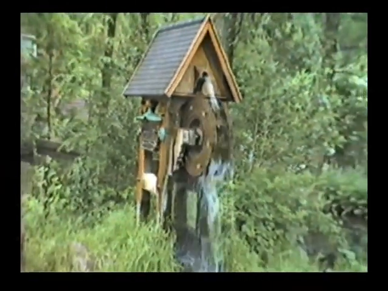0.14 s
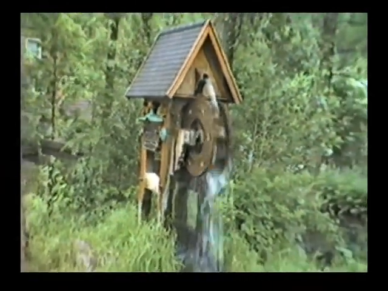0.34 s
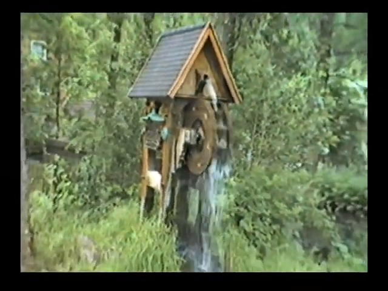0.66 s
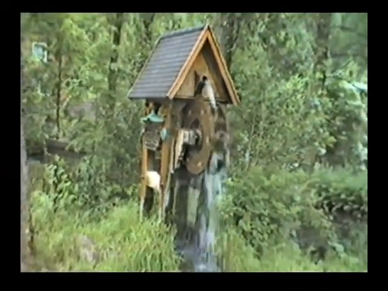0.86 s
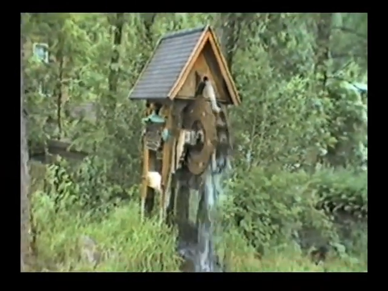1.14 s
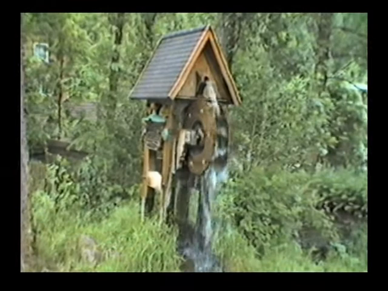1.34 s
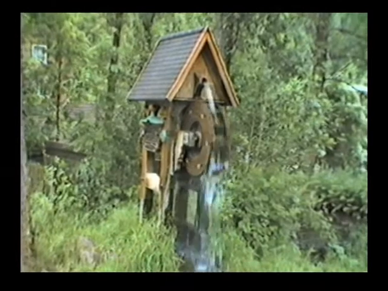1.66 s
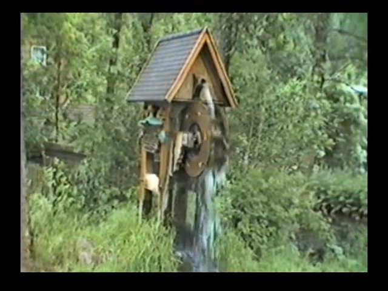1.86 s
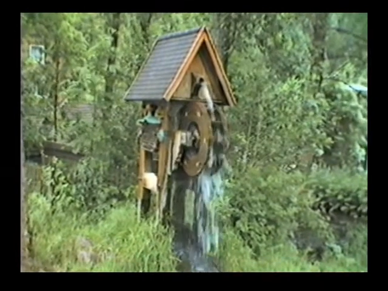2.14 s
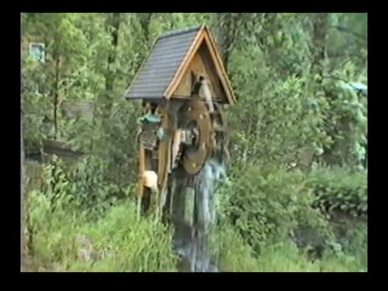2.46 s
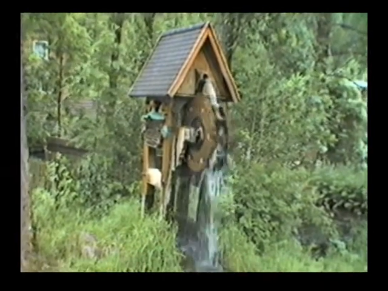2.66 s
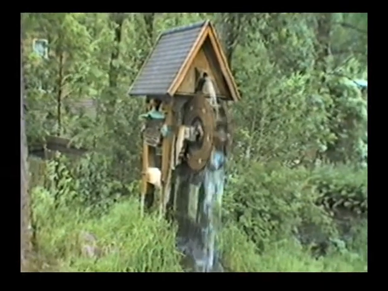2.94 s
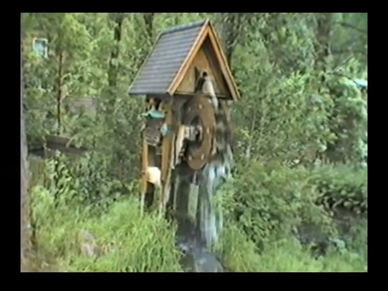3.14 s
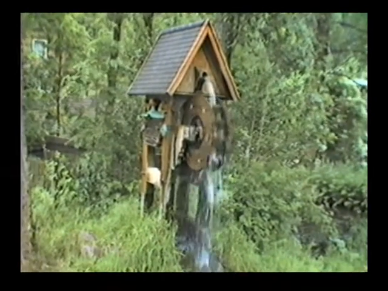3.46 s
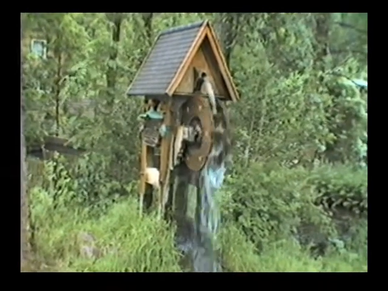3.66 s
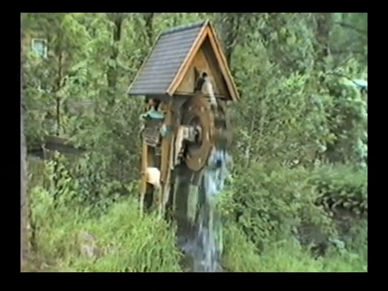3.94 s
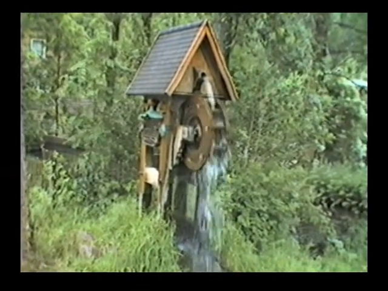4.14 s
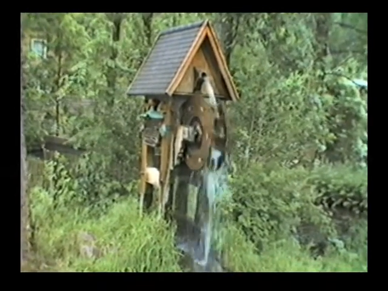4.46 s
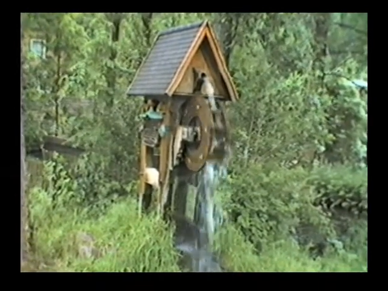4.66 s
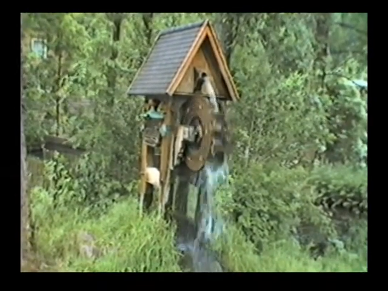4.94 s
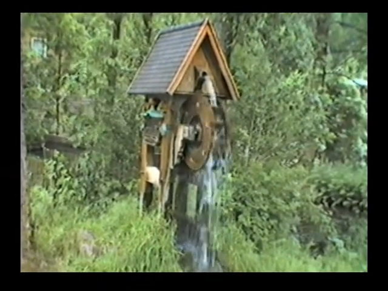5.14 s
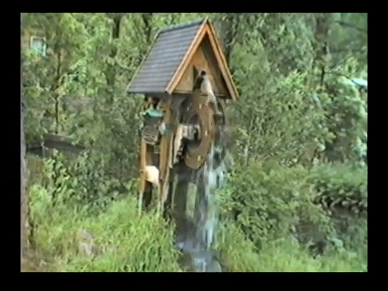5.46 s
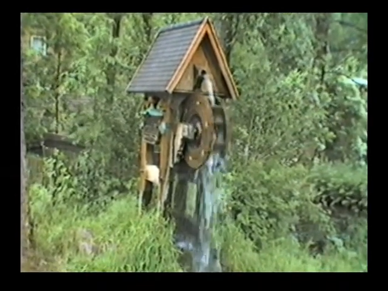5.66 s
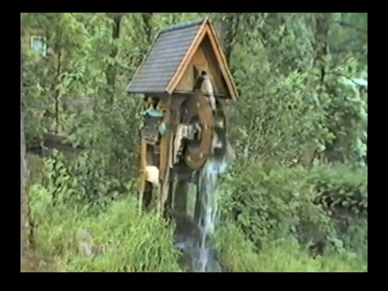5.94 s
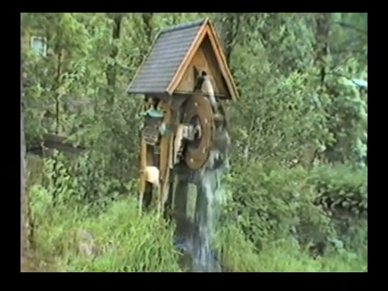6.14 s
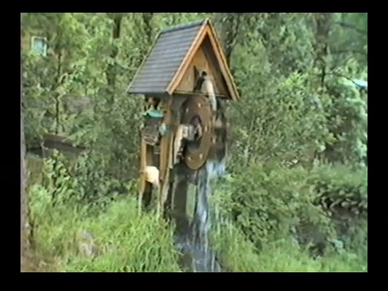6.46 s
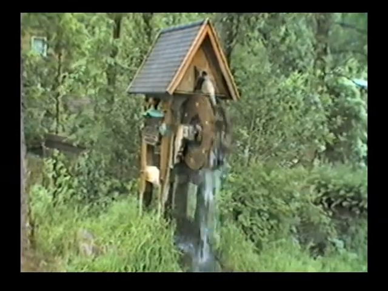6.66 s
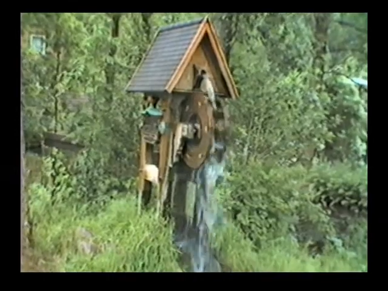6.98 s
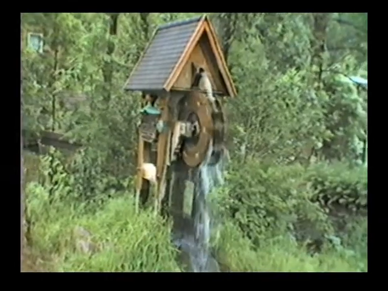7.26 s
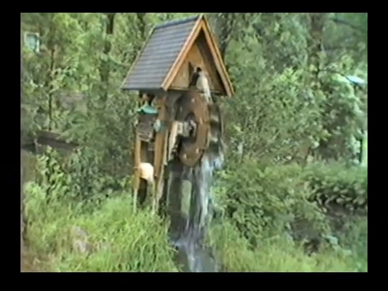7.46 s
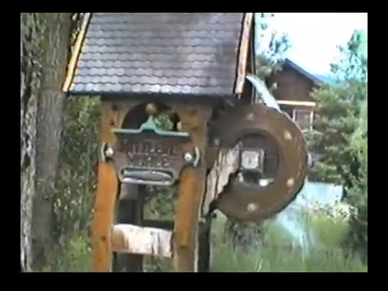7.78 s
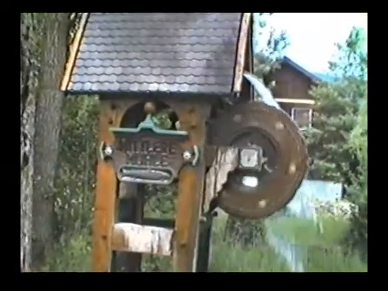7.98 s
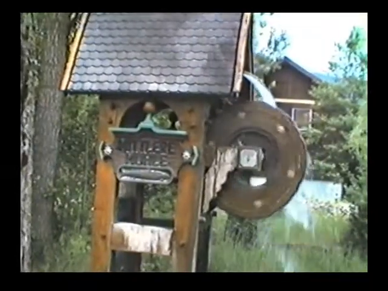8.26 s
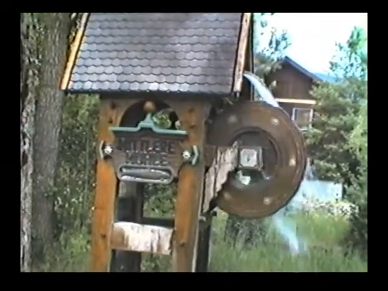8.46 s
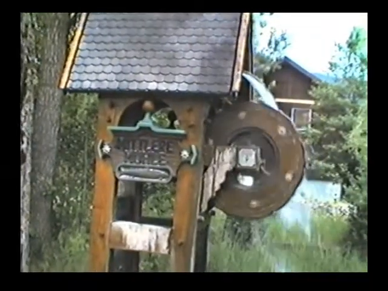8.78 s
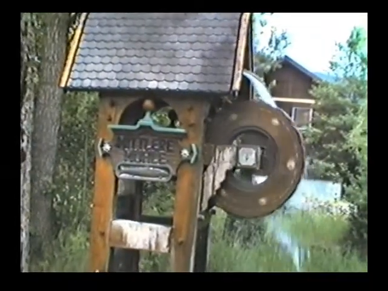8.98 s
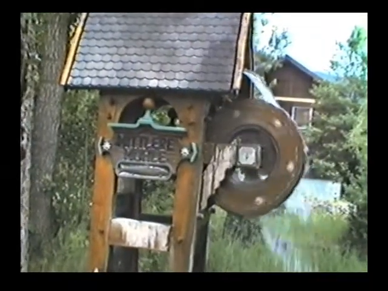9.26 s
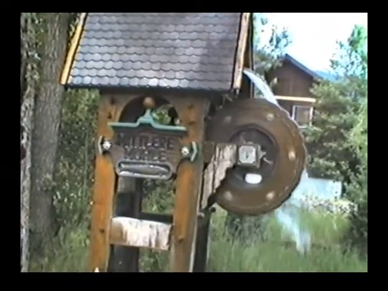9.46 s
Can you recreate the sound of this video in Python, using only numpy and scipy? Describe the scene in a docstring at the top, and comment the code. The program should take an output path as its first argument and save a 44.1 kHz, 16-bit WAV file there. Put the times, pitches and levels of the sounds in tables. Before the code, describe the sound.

A small wooden water wheel runs in a garden, heard from the front on a nearly mono camera microphone with faint hiss and thin whine. From 0 to 7.7 s, short noisy splashes fall about eight per second over steady run-off, repeating unevenly each 1.5 s turn; heavier gushes slap and resonate on hollow wood, while small bubbles plip, one clear at 0.4 s. A faint throbbing drone around 130 Hz lies behind, with one distant engine slowing until 2.4 s and another slowly climbing from 0.9 s. Light wooden clacks come near 1 s. The water grows slightly stronger towards 7.4 s. Between 7.1 and 7.9 s irregular clacks cluster, the loudest at 7.54 s, with soft low thuds. At 7.73 s the sound abruptly moves close beside the wheel: treble dulls, then partly reopens. Splashing and hollow gushes strengthen until 9.6 s, with round low glugs at 8.35, 8.65 and 9.4 s.

```python
"""In a garden a small wooden water wheel turns once in about 1.5 s. Its twelve buckets throw short splashes of
noise-like droplets over steady run-off; heavier gushes excite the damped modes of hollow wood at set places in the turn.
Bubbles ring as rising tones, and blows on the wood make clacks; a few soft low thuds join them. Behind lie a machine
hum of narrow-band noise and distant engines of harmonic orders. A small tape camera, nearly mono, listens from the
front, then from close beside, where the treble dulls suddenly and partly opens again."""
import sys
import numpy as np
from scipy import signal
from scipy.fft import rfft, irfft
from scipy.io import wavfile
from scipy.ndimage import uniform_filter1d

SR = 44100
rng = np.random.default_rng(int(sys.argv[2]) if len(sys.argv) > 2 else 0)


def wrap_up_sound(samples):
    """Save the sound to the file named by the first command line argument, as 16-bit audio."""
    columns = np.atleast_2d(samples).T
    # keep every value between -1 and 1, then stretch to whole-number steps
    tamed = np.clip(columns, -1, 1)
    steps = np.round(tamed * 32767).astype(np.int16)
    wavfile.write(sys.argv[1], SR, steps)


N = 424241
T = np.arange(N) / SR  # s
HZ = np.fft.rfftfreq(N, 1 / SR)

# gain over time of the falling water, thrown spray and gushes alike: t/s, relative level/dB
FLOW_LEVEL = [(0, -3.15), (7.4, 0.5), (8.1, -1.5), (8.4, .5), (9.62, 4)]


def amp(db):
    """Level law: decibels to amplitude ratio."""
    return 10 ** (np.asarray(db) / 20)


def evened(x):
    """Power normalisation: scales a signal to rms 1."""
    return x / np.sqrt(np.mean(x ** 2) + 1e-20)


def over_time(track):
    """Linear interpolation: a (t/s, value) track read at every sample."""
    return np.interp(T, *np.transpose(track))


def shape(points):
    """Spectral envelope: gain at every frequency, interpolated in dB over log frequency."""
    hz, db = np.transpose(points)
    return amp(np.interp(np.log(HZ + 1), np.log(hz), db))


def notch(hz, width_hz, depth_db):
    """Band rejection: a Gaussian dip, in decibels, in a frequency response."""
    return amp(-depth_db * np.exp(-((HZ - hz) / width_hz) ** 2))


def filtered(x, response):
    """Convolution theorem: filtering is multiplication of spectra."""
    return irfft(rfft(x) * response, N)


def colour(x, gain, band):
    """Linear filtering of white noise, scaled to expected rms 1 inside the band."""
    inside = (HZ > band[0]) & (HZ < band[1])
    return filtered(evened(x), gain) / np.sqrt(np.mean((gain * inside) ** 2))


def add(mix, s, sound):
    """Superposition: adds a sound to the mix at time s."""
    part = mix[round(s * SR):][:len(sound)]
    part += sound[:len(part)]


def wander(rate_hz):
    """Slow random modulation: low-passed Gaussian noise of rms 1."""
    return evened(filtered(rng.standard_normal(N), np.exp(-(HZ / rate_hz) ** 2)))


def damped_tone(hz, t60, rise):
    """Damped oscillation: a sine with a brief onset that decays by 60 dB in t60 while its pitch may climb."""
    t = np.arange(0, t60, 1 / SR)
    decay = amp(-60 * t / t60)
    onset = 1 - np.exp(-t * hz)
    return decay * np.sin(2 * np.pi * hz * t * (1 + rise * t / t60)) * onset


def patter(per_s, spread_db, mist):
    """Shot noise: random droplet impacts of uneven size, over a mist too fine to resolve."""
    strength = amp(spread_db * np.minimum(rng.exponential(1, N), 4))
    impacts = strength * rng.choice([-1, 1], N) * (rng.random(N) < per_s / SR)
    return evened(impacts) + mist * rng.standard_normal(N)


def clumps(per_s, decay_s, smooth):
    """Filtered Poisson process: sudden clumps of drops whose power relaxes in milliseconds."""
    arrivals = rng.exponential(1, N) * (rng.random(N) < per_s / SR)
    power = signal.lfilter([1], [1, -np.exp(-1 / (decay_s * SR))], arrivals)
    return evened(np.sqrt(power / power.mean() + smooth))


def swell(s, db, rise, fall):
    """Energy envelope: start time and two-sided Gaussian power of one lump of water."""
    t = np.arange(max(s - 2.5 * rise, 0), s + 2.5 * fall, 1 / SR) - s
    return s + t[0], amp(db) ** 2 * np.exp(-(t / np.where(t < 0, rise, fall)) ** 2)


def each_turn(table):
    """Periodicity of rotation: yields (t/s, 0 in front or 1 beside, rest of the row) for every turn."""
    turn_s = 1.5385
    move_s = 7.735  # the listening place changes
    # a moment when a turn begins, then the span heard from that place, all in s
    places = [(0.0, 0, move_s), (8.089, move_s, T[-1])]
    for beside, (begins, since, until) in enumerate(places):
        for turn in range(-1, int(T[-1] / turn_s)):
            for into, *rest in table:
                s = begins + turn * turn_s + into
                if since <= s < until:
                    yield s, beside, *rest


def engine(track, orders):
    """Harmonic synthesis: a few fluctuating low orders of a wandering pitch."""
    s, hz, db = np.transpose(track)
    pitch = np.interp(T, s, hz) * (1 + 0.0052 * wander(5.95))
    cycles = np.cumsum(pitch) / SR
    present = uniform_filter1d(1. * ((T >= s[0]) & (T <= s[-1])), size=6000)
    out = np.zeros(N)
    for k, order_db in orders:
        fading = amp(order_db + 2.8 * wander(2.1))
        low_cut = np.sqrt(2 / (1 + (66 / (k * pitch)) ** 12))  # the deepest orders are weak
        out += fading * low_cut * np.sin(2 * np.pi * (k * cycles + rng.random()))
    return amp(np.interp(T, s, db)) * present * out


def hum():
    """Narrow-band noise: a rough machine drone that throbs quickly, with two distant engines."""
    # drone spectrum: f/Hz, spectral level/dB
    hum_spectrum = [(20, -48), (50, -30), (68, -21.5), (90, -12.5), (105, -7.5), (117, -4.5), (133, 2),
                    (149, 0.5), (170, -15.5), (235, -19.5), (275, -27), (400, -37.5), (800, -81)]
    # drone strength: t/s, level/dB
    hum_level = [(0, -20), (1, -18.5), (3, -19.5), (5, -18), (7.5, -18.5), (8.1, -16), (9.62, -17.5)]
    # pitch glides of the distant engines: t/s, fundamental f/Hz, relative level/dB
    slowing = [(0, 44.8, -25), (.7, 44.9, -36), (1, 44.87, -22.5), (1.6, 40.95, -25), (2.4, 39.9, -35)]
    climbing = [(.9, 22.61, -28), (2.2, 27.55, -27), (3.1, 32.44, -24), (4, 36.6, -21.5), (4.7, 39.4, -25),
                (6, 40.95, -27.5), (7.7, 42.87, -26.5)]
    # their harmonic orders: multiple of the fundamental, mean relative level/dB
    slowing_orders = [(1, -0.5), (2, 2.5), (8, -24)]
    climbing_orders = [(2, -5), (3, 1), (6, -12), (9, -21)]
    drone = colour(rng.standard_normal(N), shape(hum_spectrum), band=(105, 170))
    drone /= np.sqrt(uniform_filter1d(drone ** 2, size=9000))  # holds its strength over about 0.2 s
    traffic = engine(slowing, slowing_orders) + engine(climbing, climbing_orders)
    return amp(over_time(hum_level)) * drone + amp(-4.0) * traffic


def thuds():
    """Damped oscillation at constant pitch: dull low bumps without any ring of wood."""
    # soft bumps: t/s, level/dB, f/Hz, t60/s
    bumps = [(7.541, -19, 330, 0.09), (7.669, -24.5, 277, 0.16), (7.72, -31, 42, .25),
             (7.751, -26, 258, 0.08), (7.85, -17.5, 310, 0.092), (8.16, -28, 40.4, .15)]
    out = np.zeros(N)
    for s, db, hz, t60 in bumps:
        add(out, s, amp(db) * damped_tone(hz, t60, rise=0))
    return out


def faint_bubbles(count, lowest_hz, pitch_ratio, loudest_db, range_db, rise):
    """Random superposition: many weak bubbles scattered over time and log frequency."""
    out = np.zeros(N)
    for when, pitch, size in rng.random((count, 3)):
        hz = lowest_hz * pitch_ratio ** pitch
        plop = damped_tone(hz, 36 / hz, rise)
        add(out, when * T[-1], amp(loudest_db - range_db * np.sqrt(size)) * plop)
    return out


def bubbles():
    """Bubble resonance: trapped air rings and climbs in pitch as it nears the surface of the pool."""
    # the loudest bubbles, low glugs to high plips: t/s, level/dB, starting f/Hz
    loud_bubbles = [(0.403, -16.5, 2970), (3.457, -20, 2800), (4.108, -22, 1096), (4.521, -18, 2820),
                    (4.751, -19, 3010), (5.982, -18, 1045), (6.1298, -19, 3880), (6.156, -20, 1114),
                    (7.027, -19, 1100), (8.3497, -15, 3200), (8.352, -12, 653), (8.653, -14, 618),
                    (9.2628, -20, 3200), (9.378, -17, 700), (9.46, -17.5, 1310)]
    out = np.zeros(N)
    for s, db, hz in loud_bubbles:
        # t60 is a fixed number of cycles, so small, high bubbles die sooner
        add(out, s, amp(db) * damped_tone(hz, 42 / hz, rise=0.023))
    out += faint_bubbles(330, 550, 3.2, loudest_db=-25.0, range_db=12.0, rise=0.033)
    out += faint_bubbles(500, 2300, 3, loudest_db=-19.0, range_db=12.3, rise=0.028)
    return out


def runoff():
    """Stationary shot noise: the steady run-off, broken into slow clumps."""
    # run-off spectrum: f/Hz, spectral level/dB
    runoff_spectrum = [(100, -12), (300, 10), (450, 10), (720, 10), (1000, 5.5), (1400, 6.5), (1900, -1.5),
                       (2800, 0.5), (5800, 0), (7000, -4), (8300, -9.5), (10000, -24.5), (13000, -46)]
    droplets = patter(per_s=2500, spread_db=2.5, mist=1.0)
    flow = colour(droplets, shape(runoff_spectrum), band=(3000, 7000))
    return amp(-40.5) * flow * clumps(per_s=120, decay_s=0.007, smooth=1.0)


def spray():
    """Modulated shot noise: each bucket throws a shower whose power swells and drains."""
    # the twelve buckets: t/s into the turn, relative level/dB, nominal length/s
    buckets = [(.03, -33.5, .055), (.172, -33.5, 0.047), (.285, -30, 0.024), (.43, -33, 0.035),
               (.548, -33.5, 0.063), (.688, -34.5, 0.065), (.815, -35.5, 0.064), (.945, -33, 0.031),
               (1.052, -33, .045), (1.195, -34, 0.036), (1.305, -34, 0.044), (1.445, -32.5, 0.025)]
    # spray spectrum: f/Hz, spectral level/dB
    spray_spectrum = [(150, -21), (450, -4.5), (750, 3.5), (1000, -3), (1400, 5), (2000, 0.5), (2600, 2.5),
                      (3400, 4), (4500, 1), (5800, 3.5), (7000, -2), (8300, -6.5), (10000, -25),
                      (13000, -56)]
    slop_s, fill_db, stretch_spread = .004, 0.73, 0.36  # chance in moment, strength and log duration
    rise_share, fall_share = 0.48, 0.54  # of a splash's length
    flow = np.zeros(N)
    for s, beside, db, length in each_turn(buckets):
        late, fill, slow = rng.standard_normal(3)
        stretch = np.exp(stretch_spread * slow)
        length = length * stretch
        start, power = swell(s + slop_s * late, db + fill_db * fill, length * rise_share, length * fall_share)
        add(flow, start, power / stretch)  # the same water, poured more slowly, is quieter
    droplets = patter(per_s=4500, spread_db=3.0, mist=1.0)
    thrown = colour(droplets, shape(spray_spectrum), band=(3000, 7000))
    thrown = thrown * np.sqrt(flow) * amp(over_time(FLOW_LEVEL))
    return amp(-1.67) * thrown * clumps(per_s=260, decay_s=0.0023, smooth=0.66)


def clacks():
    """Modal synthesis: a blow rings the wooden modes near its own pitch, with a dull tick on top."""
    # blows: t/s, ring peak level/dB, centre f/Hz, spread/octave, factor on the ring time
    blows = [(.966, -22, 1560, 0.46, 0.71), (1.0688, -10.5, 1250, 1.2, 0.74), (7.142, -11.5, 1334, 0.66, 1),
             (7.427, -17, 1000, 0.88, 1.2), (7.537, -11, 1200, 0.72, 1.2), (7.5413, 3, 1180, 0.9, 1.27),
             (7.6701, -10.5, 1000, 0.94, 1.8), (7.7004, -3.5, 1870, 1.14, 0.41),
             (7.727, -15.5, 1300, 1.1, 1.0), (7.834, -13, 625, 0.73, 0.69), (7.883, -15.5, 1350, 1.2, 1.2),
             (8.203, -20, 1200, 0.7, 0.92)]
    # modes of the wheel: f/Hz, relative level/dB, t60/s before the blow's factor
    wood_modes = [(531, 6, 0.031), (720, -2.5, 0.031), (1000, 2, 0.021), (1270, -1, 0.022),
                  (1445, -0.5, 0.042), (1690, -3, 0.015), (2430, -15, 0.024), (3870, -9, 0.022)]
    out, t = np.zeros(N), np.arange(4000) / SR
    hz, db, t60 = np.transpose(wood_modes)[:, :, None]
    sign = (-1) ** np.arange(len(wood_modes))[:, None]  # neighbouring modes start in opposite directions
    soft = signal.butter(4, 5200, fs=SR, output="sos")
    for s, peak_db, centre_hz, spread, ringing in blows:
        reach = np.exp(-(np.log2(hz / centre_hz) / spread) ** 2)
        decay = amp(db - 60 * t / (t60 * ringing))
        ring = (sign * reach * decay * np.sin(2 * np.pi * hz * t)).sum(0)
        tick = signal.sosfilt(soft, rng.standard_normal(len(t))) * np.exp(-t / .0016)
        add(out, s, amp(peak_db) * (ring / abs(ring).max() + 0.28 * tick))
    return out


def resonant_body(modes, hz):
    """Modal superposition: complex response of damped resonators with alternating sign."""
    response = 0
    for k, (f, width, db) in enumerate(modes):
        response = response + amp(db) / (1 + 1j * (hz ** 2 - f ** 2) / (hz * width)) * (-1) ** k
    return response


def gushes():
    """Source and resonator: coarse blobs of water slap down and drum on the hollow wood."""
    # lumps of water: t/s into the turn, relative level/dB, rise/s, fall/s, f/Hz setting the spectral tilt
    lumps = [(.262, -24, 0.03, 0.024, 850), (.493, -21, 0.0031, 0.011, 900),
             (.532, -23.5, .012, 0.016, 820), (.567, -31.5, .003, .015, 700), (.675, -37, .01, 0.054, 850),
             (.997, -31, .016, 0.012, 800), (1.056, -35.5, .005, .012, 800),
             (1.217, -29, 0.0056, 0.0076, 820), (1.287, -30.5, 0.0035, 0.011, 760),
             (1.32, -36.5, 0.013, .018, 760)]
    # hollow resonances heard from the front and from beside: f/Hz, bandwidth/Hz, relative level/dB
    front_modes = [(512, 84, -1.5), (728, 51, 5), (1072, 160, -6), (1278, 78, -1.5), (1450, 79, -5),
                   (1776, 61, -12.5), (2100, 170, -14.5), (2430, 46, -8.5), (2896, 150, -12.5),
                   (3940, 310, -19)]
    beside_modes = [(566, 110, 0.5), (682, 77, 3), (838, 41, 5), (1213, 140, -5), (1440, 84, -7),
                    (2400, 400, -13), (3050, 93, -15.5), (3940, 360, -17)]
    chance_db, beside_db = 1.3, 2.4  # spread from turn to turn; gain close beside the wheel
    beside_pitch = 0.99  # the tilt is a little darker there
    size = 8192
    hz = np.fft.rfftfreq(size, 1 / SR) + 1
    bodies = [resonant_body(modes, hz) for modes in (front_modes, beside_modes)]
    slaps, out = patter(per_s=1400, spread_db=3.0, mist=0.35), np.zeros(N)
    for s, beside, db, rise, fall, centre_hz in each_turn(lumps):
        flow_db = np.interp(s, *np.transpose(FLOW_LEVEL))
        level_db = db + flow_db + beside_db * beside + chance_db * rng.standard_normal()
        start, power = swell(s, level_db, rise, fall)
        drive = slaps[round(start * SR):][:len(power)] * np.sqrt(power)
        slope = 3 * np.log(centre_hz * beside_pitch ** beside / 800)
        tilt = np.clip(hz / 900, .5, 1.6) ** slope  # a higher centre is brighter
        ring = irfft(rfft(drive, size) * bodies[beside] * tilt, size)
        add(out, start, ring * np.sqrt(power.sum() / np.sum(ring ** 2)))  # ring energy follows the swell
    return amp(0.7) * out


def scene():
    """Mid-side superposition: sources straight ahead, with a little diffuse treble in the side signal."""
    # quadrature part of the side signal: f/Hz, level relative to mid/dB
    width = [(100, -46), (700, -41), (1300, -40), (2400, -30), (4400, -18), (8100, -14), (15000, -16)]
    # diffuse part, through a short random filter: f/Hz, level relative to mid/dB
    diffuse_level = [(1500, -45), (3100, -24), (6800, -17), (10000, -15)]
    hollow = notch(hz=1703, width_hz=124, depth_db=9.5)  # in the water's wash
    water = filtered(spray() + runoff() + bubbles(), hollow)
    mid = water + gushes() + clacks() + thuds() + hum()
    taps = evened(rng.standard_normal(300)) / np.sqrt(300)
    diffuse = shape(diffuse_level) * rfft(taps, N)
    side = filtered(mid, diffuse - 1j * shape(width))
    return np.array([mid + side, mid - side])


def dulled(x):
    """Time-varying low-pass: the treble dulls suddenly, then partly opens again."""
    # cutoff of the treble: t/s, upper edge f/Hz
    treble_edge = [(0, 15000), (7.735, 15000), (7.76, 5140), (8, 5660), (8.3, 6440), (8.7, 7360),
                   (9.2, 8600), (9.62, 9700)]
    hz, t, z = signal.stft(x, SR, nperseg=256)
    edge = np.interp(t, *np.transpose(treble_edge))
    return signal.istft(z / np.sqrt(1 + (hz[:, None] / edge) ** 10), SR, nperseg=256)[1][:, :N]


def snap():
    """Band-limited transient: one thin tick of windowed noise as the treble dulls."""
    out, length = np.zeros(N), 900
    thin = signal.butter(2, [8800, 11500], "bandpass", fs=SR, output="sos")
    burst = rng.standard_normal(length) * np.hanning(length)
    add(out, 7.73, amp(-33.5) * signal.sosfilt(thin, burst))
    return out


def tape_hiss(edge_hz):
    """Partly correlated noise: a common hiss plus a weaker independent one in each channel."""
    # hiss spectrum: f/Hz, spectral level/dB
    hiss_spectrum = [(20, -53), (9000, 21.5), (15500, 19)]
    gain = shape(hiss_spectrum)
    common, left, right = (colour(rng.standard_normal(N), gain, (0, edge_hz)) for _ in range(3))
    return amp(-63.0) * (common + .45 * np.array([left, right]))


def record(dry):
    """Saturation and band limiting: soft overload, a housing dip, hiss and the camera's thin whine."""
    edge_hz, ceiling = 15750, .85  # upper band limit; amplitude that the input approaches
    housing = notch(hz=7510, width_hz=390, depth_db=7)
    squeezed = dry / (1 + (dry / ceiling) ** 8) ** (1 / 8)  # rounds off the loudest clack
    sound = dulled(filtered(squeezed, housing))
    whine = amp(-78.0) * np.sin(2 * np.pi * 15625 * T)
    heard = sound + snap() + tape_hiss(edge_hz) + whine
    band_limit = signal.firwin(1023, edge_hz, window=("kaiser", 9), fs=SR)
    return signal.oaconvolve(heard, band_limit[None], "same")


dry = scene()
out = record(dry)
wrap_up_sound(out)
```